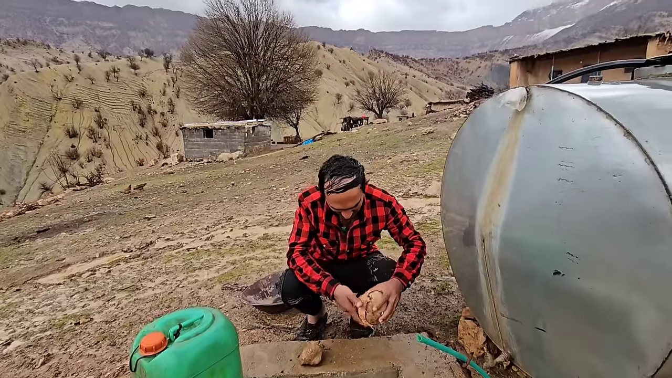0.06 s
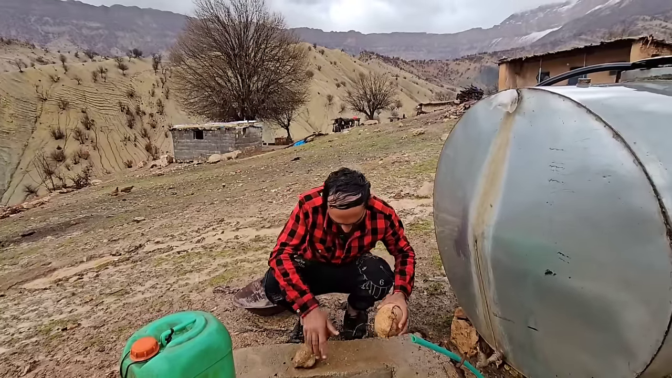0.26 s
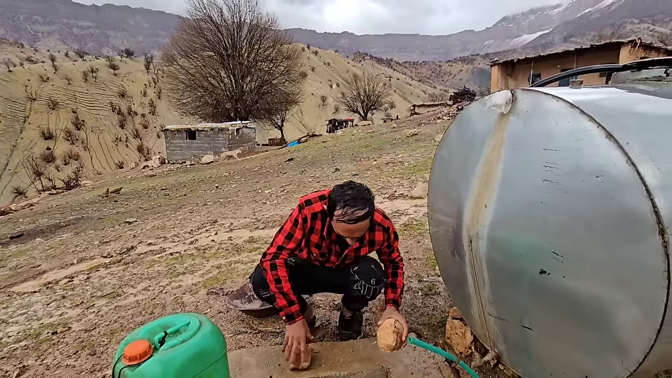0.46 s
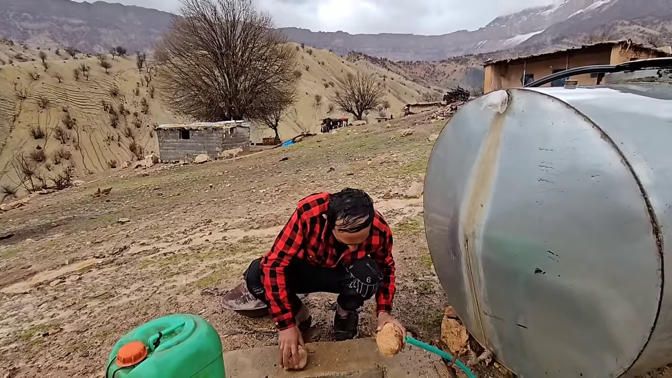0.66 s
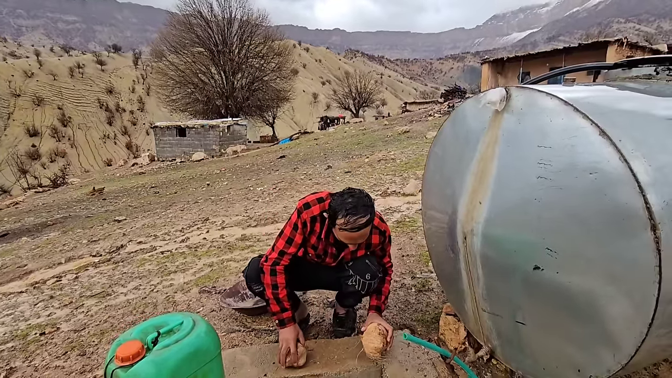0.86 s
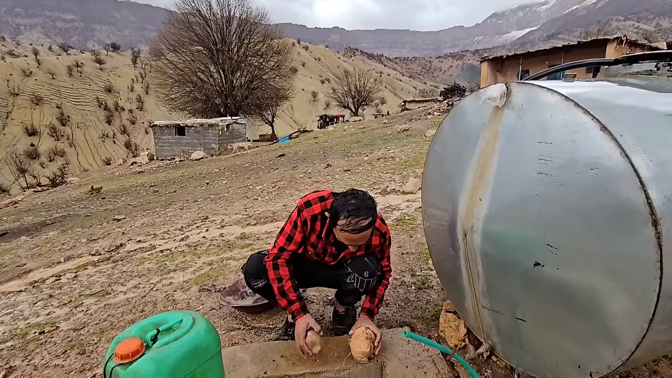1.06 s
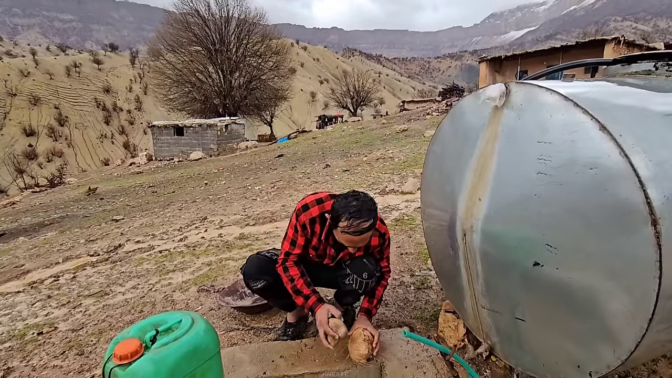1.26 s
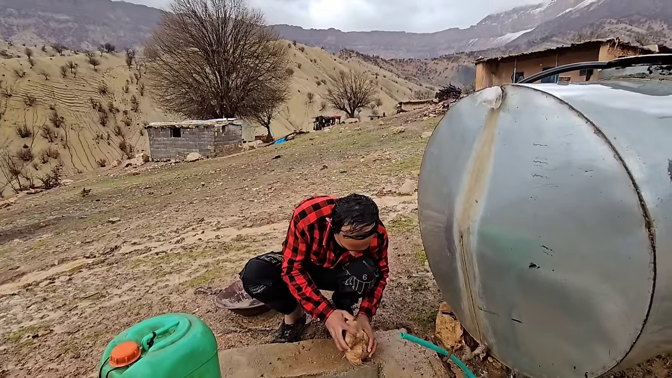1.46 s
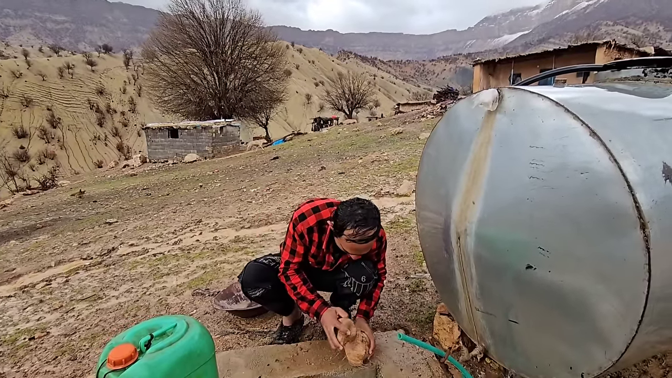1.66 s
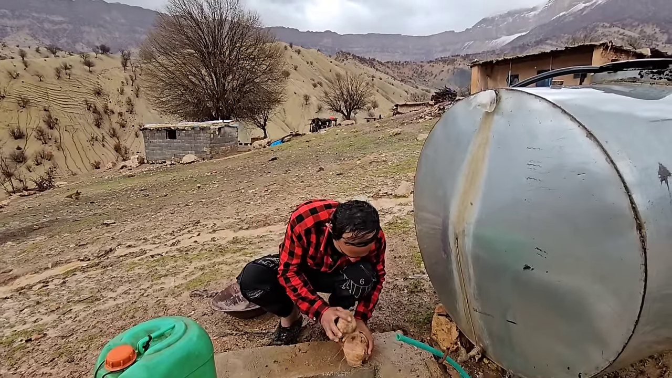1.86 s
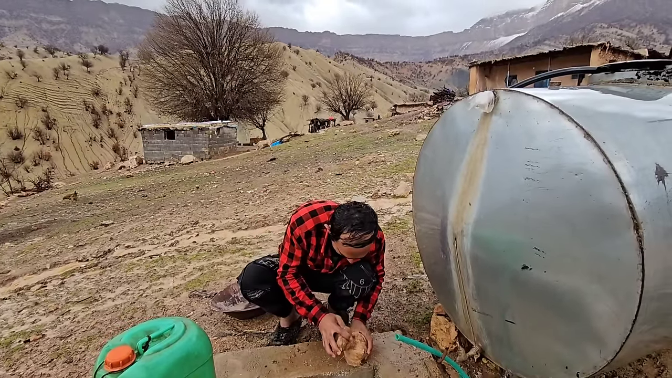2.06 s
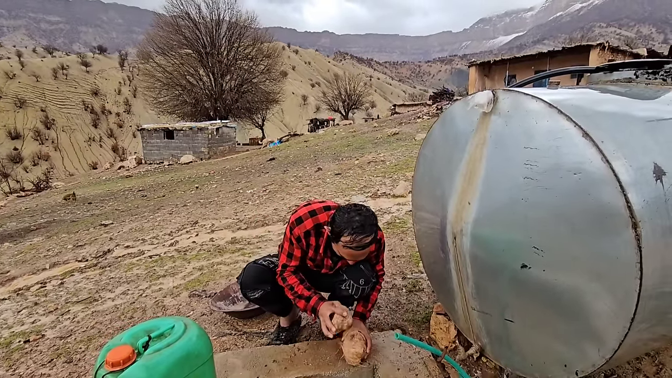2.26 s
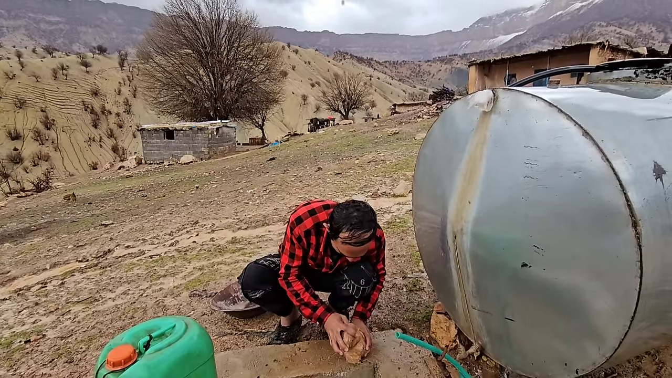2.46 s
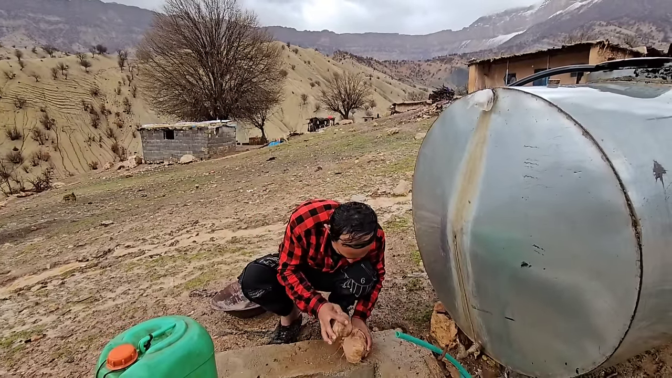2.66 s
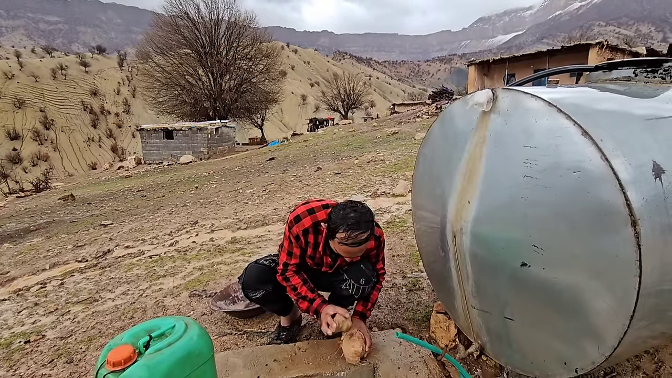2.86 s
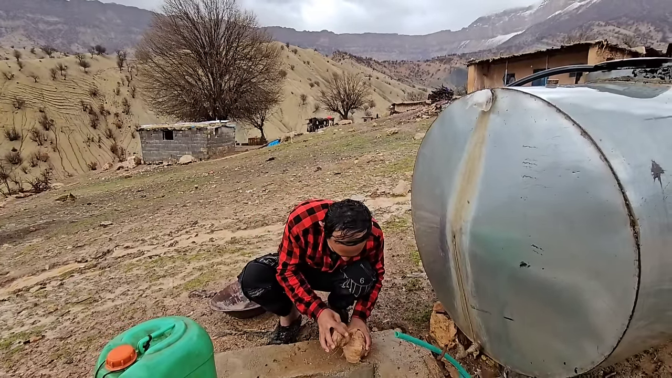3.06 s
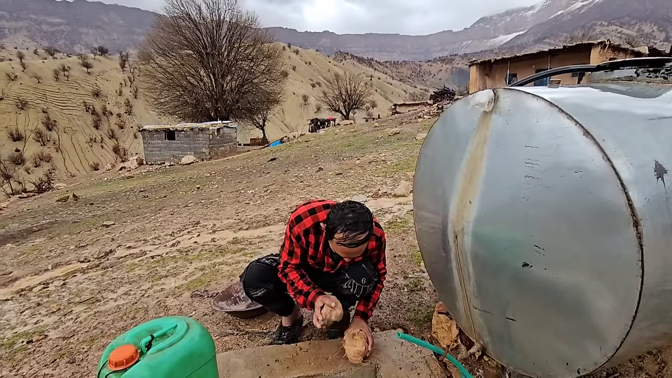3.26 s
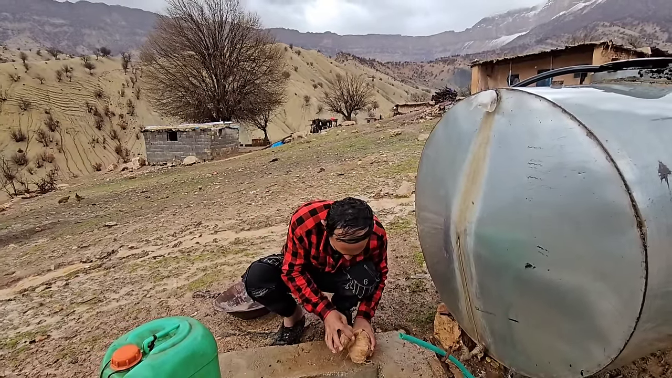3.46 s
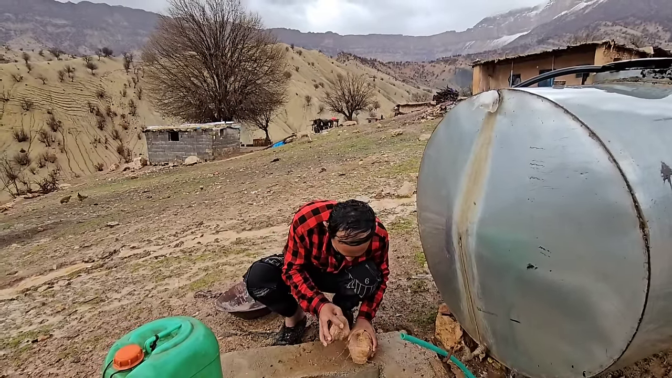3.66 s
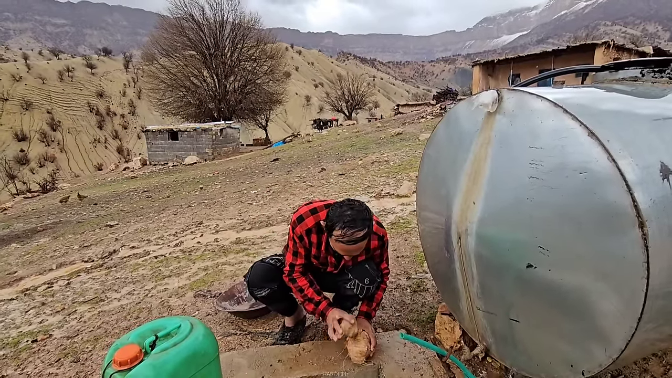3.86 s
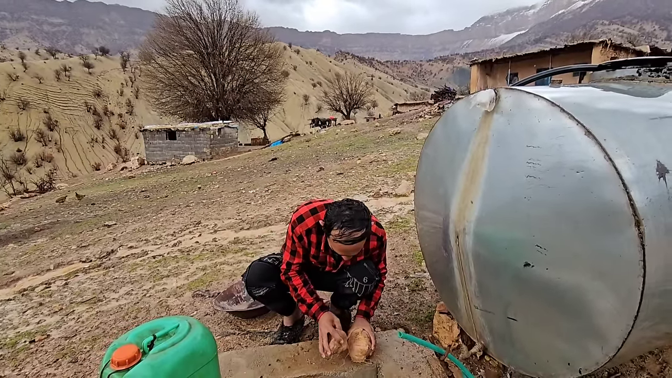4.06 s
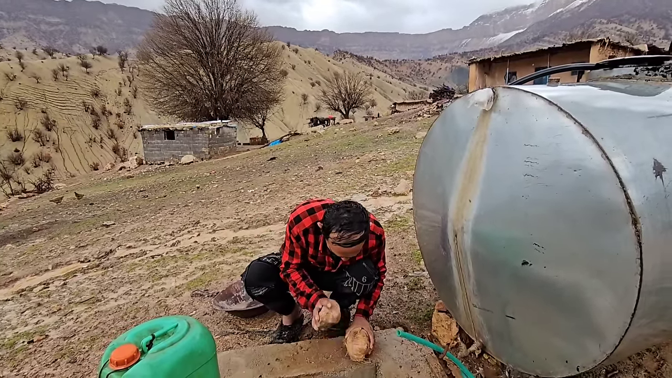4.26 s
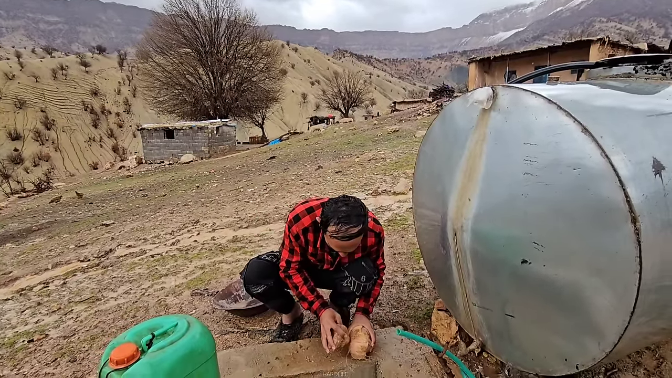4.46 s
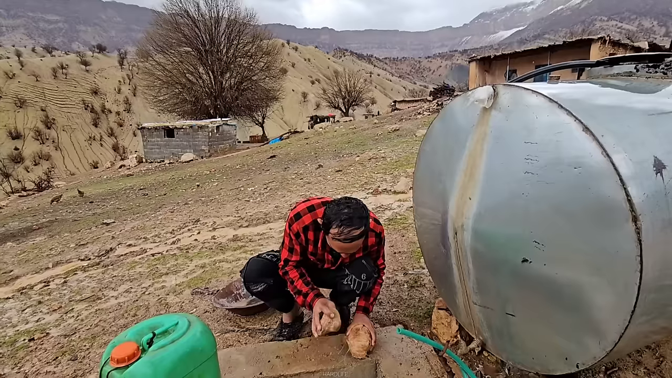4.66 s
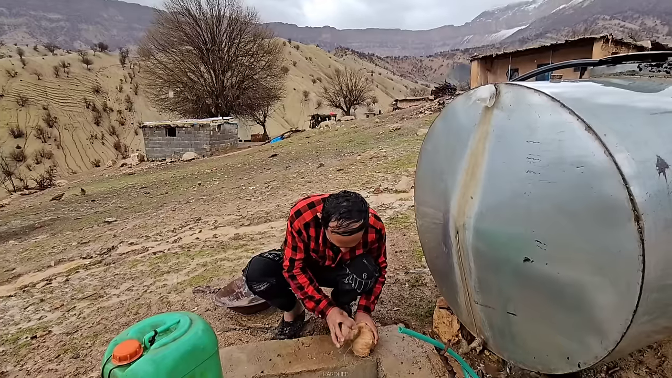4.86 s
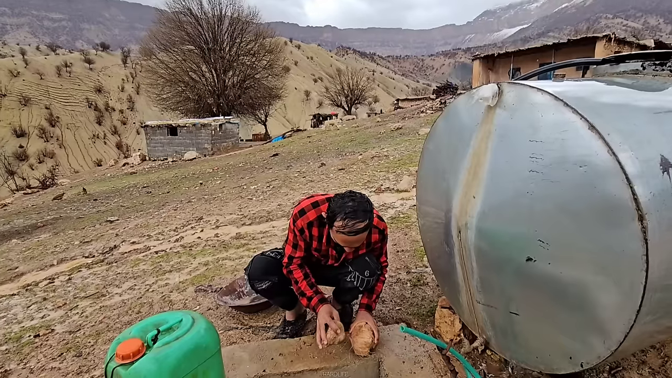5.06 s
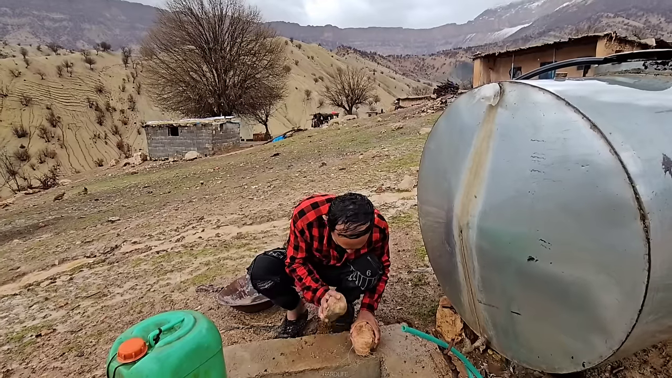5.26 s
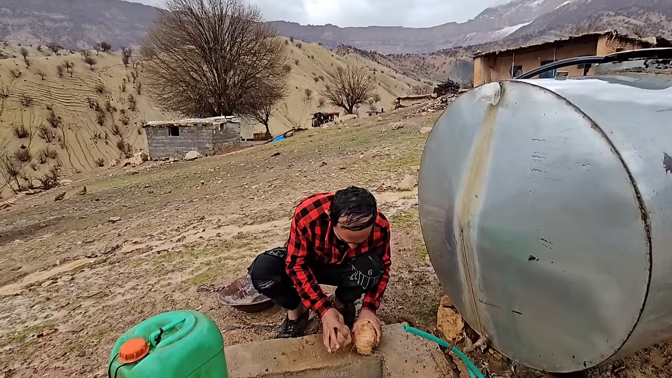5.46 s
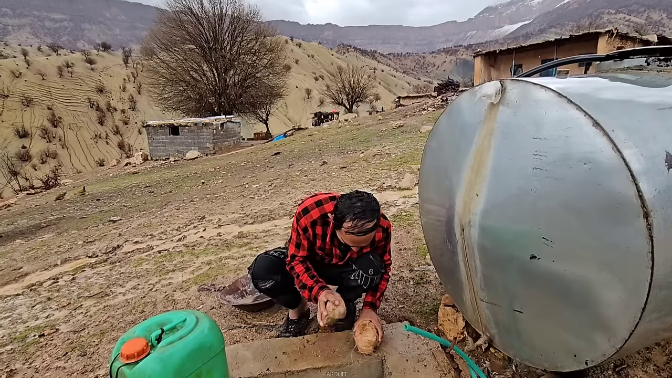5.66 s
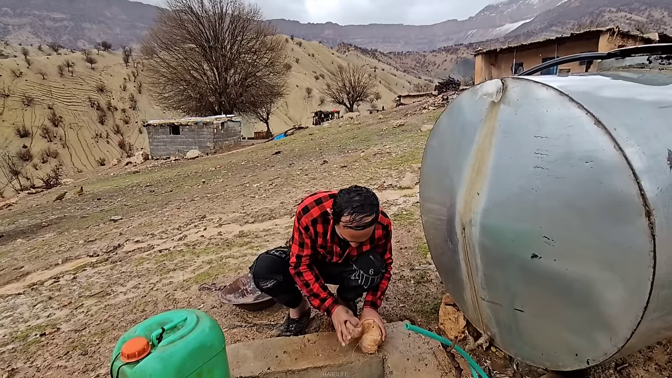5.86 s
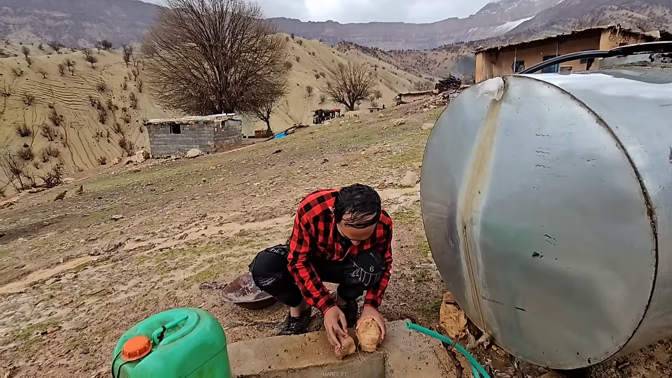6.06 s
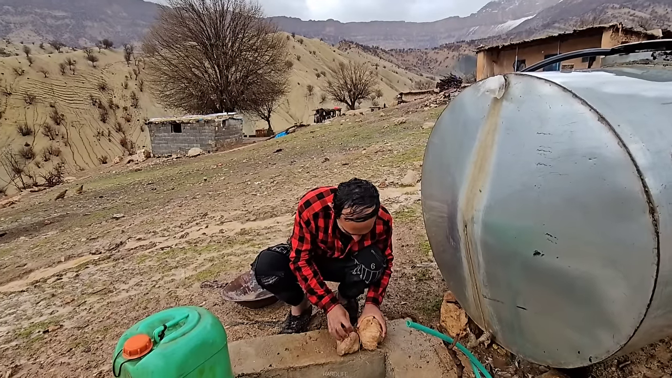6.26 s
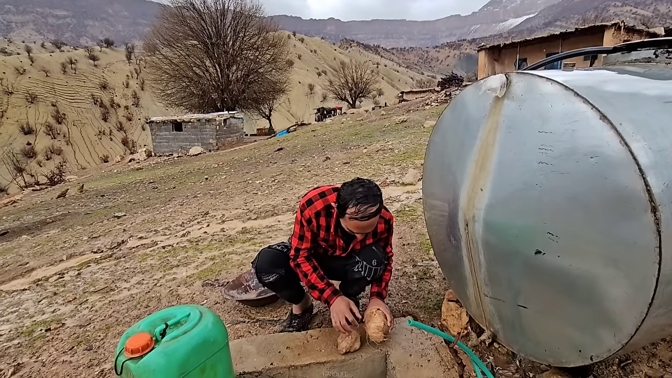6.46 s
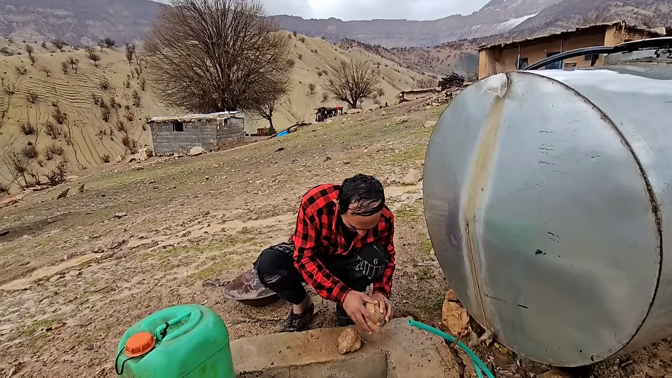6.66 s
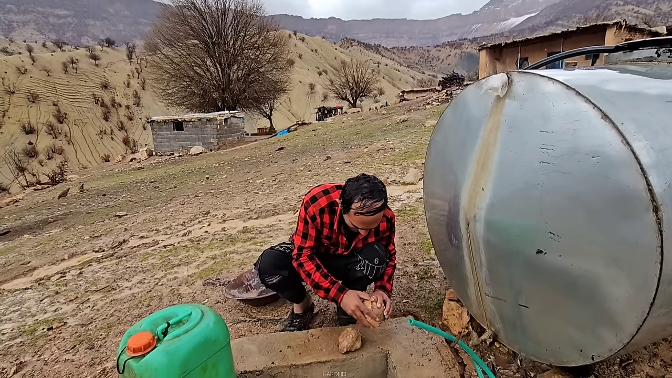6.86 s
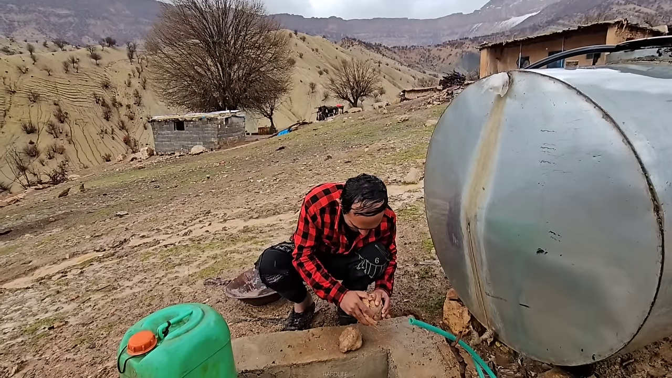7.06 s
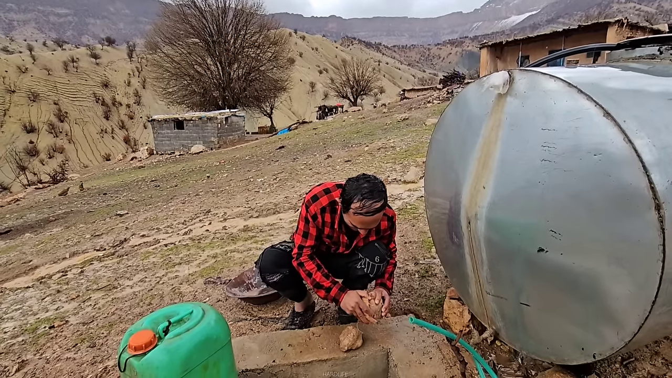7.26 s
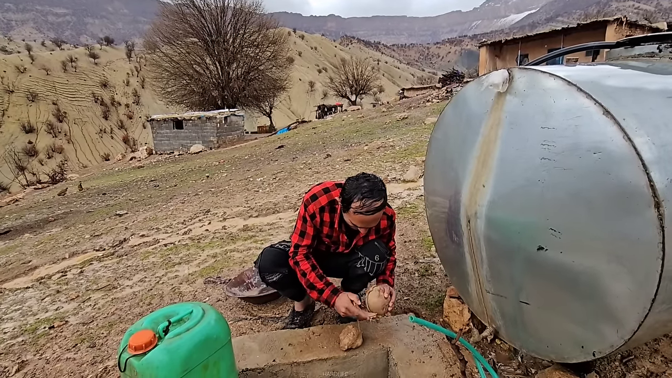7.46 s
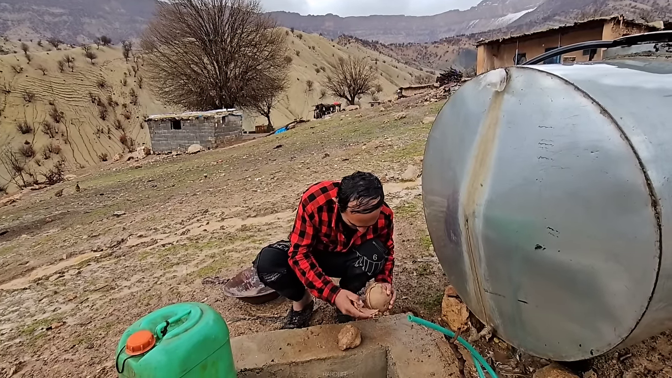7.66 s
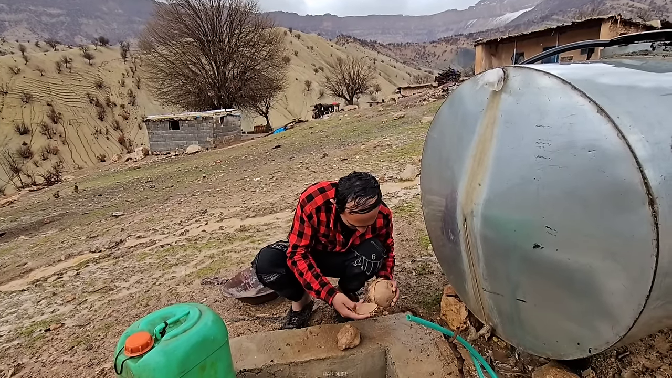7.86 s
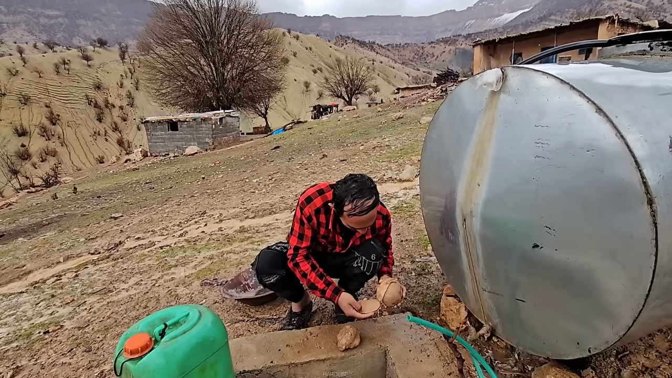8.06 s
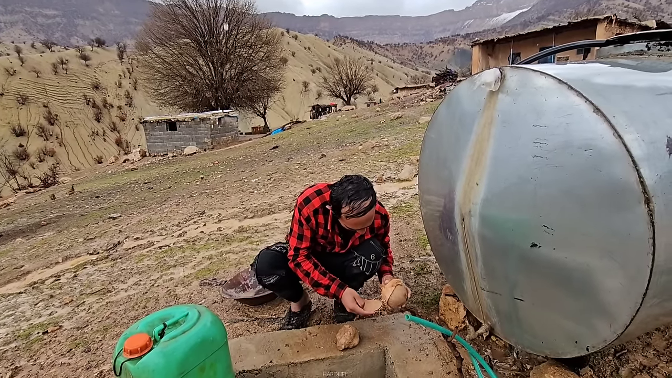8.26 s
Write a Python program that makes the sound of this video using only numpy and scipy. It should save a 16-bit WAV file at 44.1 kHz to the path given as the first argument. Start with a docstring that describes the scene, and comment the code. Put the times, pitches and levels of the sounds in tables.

```python
"""Water hisses steadily off to the left while a light wind rumbles on the microphone: both are shaped noise.
Shoes shift, a sleeve brushes and a stone scuffs; then a man on a hillside strikes stone with stone, ten times,
on a concrete slab beside a steel tank. Each blow is a noisy crack, ringing modes, a tock and a falling thump.
He drops the hammer stone, then snaps the struck one apart in his hands, in sharp bursts of crushed grain."""
import sys
import numpy as np
from scipy import signal
from scipy.fft import rfft, irfft
from scipy.io import wavfile
from scipy.ndimage import uniform_filter1d

SR = 44100
rng = np.random.default_rng(int(sys.argv[2]) if len(sys.argv) > 2 else 0)


def bounce(signal):
    """Save signal as a 16-bit WAV file at the path given by the first command-line argument."""
    frames = np.transpose(np.atleast_2d(signal))
    limited = np.clip(frames, -1, 1)
    pcm = np.round(limited * 32767).astype(np.int16)
    wavfile.write(sys.argv[1], SR, pcm)


N = 366912
T = np.arange(8192) / SR  # time axis of one short sound, s

# blows of stone on stone: (start_s, crack_db, thump_db, tock_hz, tock_db against the crack,
# upper_resonance_hz, treble_db)
BLOWS = [(1.455, -36, -34, 1270, -9, 7560, 6), (1.893, -24, -16.5, 1034, -4, 4520, -11.5),
         (2.4155, -28, -17, 1680, -5.5, 8000, -13), (2.8774, -19.5, -15, 1700, -4, 13250, -12),
         (3.3728, -17.5, -16, 1813, -2.5, 9800, 2), (3.8687, -20.5, -16, 1690, -12, 10100, -14),
         (4.3370, -15.5, -15.5, 1810, -10, 2980, -1.5), (4.8235, -15.5, -16.5, 1680, -9.5, 3520, -3.5),
         (5.3064, -15, -14, 2120, -7.5, 3900, -4), (5.8247, -13.5, -19.5, 2390, -8, 3570, -0.5)]
# colour of brittle stone and grit snapping: (pitch_hz, level_db)
SNAP_COLOUR = [(200, -6), (950, -31), (1350, -3.5), (2400, -3), (3400, -5.5), (4400, 3), (5700, -7.5),
               (6600, 1), (7900, 5.5), (9500, -0.5), (11000, -4.5), (13000, -10.5), (16000, -7.5)]

BUMP_RISE_S, BUMP_T60_S = 0.00051, 0.02


def amp(db):
    """Decibels to gain."""
    return 10 ** (np.asarray(db) / 20)


def unit(x):
    """Scales to rms 1."""
    return x / np.sqrt(np.mean(x ** 2) + 1e-20)


def burst(x):
    """Scales a short sound so that its energy equals rms 1 held for a hundredth of a second."""
    return unit(x) * np.sqrt(.01 * SR / x.shape[-1])


def read(points, hz):
    """Reads a table along a log-frequency axis."""
    f, value = np.transpose(points)
    return np.interp(np.log(hz + 1e-6), np.log(f), value)


def add(mix, s, sound):
    """Mixes a stereo sound in at time s."""
    part = mix[:, max(round(s * SR), 0):][:, :sound.shape[1]]
    part += sound[:, :part.shape[1]]


def colour(x, curve):
    """Causal, minimum-phase filter whose gain in dB is curve(Hz)."""
    size = 2 * len(T)
    log_gain = np.log(amp(curve(abs(np.fft.fftfreq(size, 1 / SR)))))
    response = np.exp(np.conj(signal.hilbert(log_gain)))
    taps = np.fft.ifft(response).real[:len(T) // 2]
    return signal.oaconvolve(x, taps[None], axes=1)[:, :x.shape[1]]


def hump(hz, centre_hz, octaves):
    """A bell of height 1 on the log-frequency axis."""
    return np.exp(-.5 * (np.log2((hz + 1) / centre_hz) / octaves) ** 2)


def lean(x, side):
    """Tips each frequency to the left or right port."""
    half_db = read(side, np.fft.rfftfreq(N, 1 / SR)) / 2
    return irfft(rfft(x) * amp([half_db, -half_db]), N)


def water(patch_db=2.0, lead_s=0.00056, level_db=-42.84):
    """Steady running water: finely mottled noise that reaches the left port first."""
    # spectrum of the water before levelling: (pitch_hz, level_db per Hz)
    water_colour = [(59, -13), (100, 1), (162, -11), (228, -4), (287, -11), (370, -13), (487, -10.5),
                    (825, -20.5), (1290, -16.5), (1920, -22), (2090, -21), (5280, -36), (8410, -40.5),
                    (10400, -43.5), (15500, -58.5)]
    # how alike the water is at the two ports: (pitch_hz, likeness 0-1)
    likeness = [(250, 0.9), (650, 0.79), (1000, 0.37), (1400, 0.15), (1800, 0.17), (3000, 0.27),
                (5000, 0.15)]
    # lean of the water: (pitch_hz, left_minus_right_db)
    water_side = [(150, 0.5), (400, 3), (800, 0.5), (1300, 3.6), (2400, 8.8), (4400, 1), (8000, 3.8),
                  (10500, 5), (14000, 32)]
    frames, hz = N // 256 + 5, np.fft.rfftfreq(1024, 1 / SR)
    a, b, c, d, patches = rng.standard_normal((5, frames, len(hz)))
    patches = uniform_filter1d(patches, size=7, axis=0)
    patches = unit(uniform_filter1d(patches, size=12, axis=1))
    same = np.clip(read(likeness, hz), 0, 1)
    left = a + 1j * b
    # the lead shrinks towards the bass
    delay = np.exp(-2j * np.pi * hz * lead_s * hz / (hz + 250))
    right = same * left * delay + np.sqrt(1 - same ** 2) * (c + 1j * d)
    z = np.array([left, right]) * amp(read(water_colour, hz) + patch_db * patches)
    hiss = signal.istft(z.swapaxes(1, 2), nperseg=1024, noverlap=768)[1][:, :N]
    return amp(level_db) * unit(lean(hiss, water_side))


def wind(apart=0.35, buffet_db=4.0, lift_db=2.66):
    """Low lumpy gusts of filtered noise, a little different at each port."""
    # strength of the wind before the lift and the buffets: (time_s, level_db)
    gusts = [(0.0, -43), (0.16, -52.5), (1.04, -51), (1.48, -45.5), (1.85, -42.5), (2.17, -49.5),
             (2.8, -45.5), (3.12, -53), (4.32, -52.5), (4.51, -51), (5.15, -47), (5.57, -41), (5.8, -38),
             (6.26, -46), (6.7, -42), (6.94, -50.5), (7.7, -55), (8.3, -47.5)]
    # colour of the rumble: (pitch_hz, level_db)
    rumble_colour = [(15, -31), (35, -2), (60, -0.5), (90, -5.5), (140, -13), (300, -26.5), (1000, -64.5)]
    noise = rng.standard_normal((4, N))
    rumble = unit(colour(noise[0] + apart * noise[1:3], lambda f: read(rumble_colour, f)))
    buffets = unit(uniform_filter1d(uniform_filter1d(noise[3], size=3000), size=2000))
    strength_db = np.interp(np.arange(N) / SR, *np.transpose(gusts)) + buffet_db * buffets
    return rumble * amp(lift_db + strength_db) * amp([[-1.8], [.3]])  # port trims, dB


def contact(rise, t60, shared, size=70):
    """Grains crush where stones meet: a spray of force, even in spectrum, partly alike at both ports."""
    shared = np.clip(shared, 0, 1)
    noise = rng.standard_normal((3, len(T)))
    mixed = np.sqrt(shared) * noise[0] + np.sqrt(1 - shared) * noise[1:]
    spray = mixed * (1 - np.exp(-T / rise)) * 1e-3 ** (T / t60)
    z = rfft(spray)
    # divide by the spectrum smoothed over size bins
    even = irfft(z / np.sqrt(uniform_filter1d(abs(z) ** 2, size, axis=1)))
    return even * (T < T[-1] / 2)


def grit(per_s=22, level_db=-71, spread_db=4.5):
    """Stray tiny ticks of sand under hands and feet: contacts at random moments."""
    strengths = amp(spread_db * np.minimum(rng.exponential(1, N), 3))
    clicks = (rng.random(N) < per_s / SR) * strengths
    tick = contact(rise=0.00013, t60=.015, shared=0.52)
    ticks = signal.oaconvolve(clicks[None], tick, axes=1)[:, :N]
    return amp(level_db) * unit(colour(ticks, lambda f: read(SNAP_COLOUR, f)))


def shuffle(start_s=.3, length_s=1.18, level_db=-53, fade=0.47):
    """Shoes grind quietly on damp soil while he settles: one slow swell of noise."""
    out, size = np.zeros((2, N)), int(length_s * SR)
    soil = colour(rng.standard_normal((2, N)), lambda f: 35 * hump(f, 1350, octaves=1.7))[:, :size]
    add(out, start_s, amp(level_db) * unit(soil) * signal.windows.tukey(size, fade))
    return out


def knock(hz, rise, t60, lift_db):
    """A stone meets the slab: a dull knock of crushed grain centred on hz."""
    # colour of the knock: (multiple of the centre pitch, level_db)
    knock_colour = [(.1, 2.5), (.35, 7.5), (.7, 0.5), (1, 5), (1.35, 2.5), (1.9, -12.5), (4, -33),
                    (12, -48)]
    force = contact(rise, t60, shared=0.72)
    return burst(colour(force, lambda f: read(knock_colour, f / hz) + lift_db * hump(f, hz, octaves=0.3)))


def heave(hz=70, decay=0.015, rise=0.011):
    """The soil under the slab gives way and springs back: a low damped sine of varying pitch."""
    wave = np.sin(2 * np.pi * hz * rng.uniform(0.84, 1.34) * T)
    return burst(wave * (1 - np.exp(-T / rise)) * np.exp(-T / decay))


def bumps(heave_db=-5):
    """A stone is nudged, set down or let fall on the slab, which heaves a little under it."""
    # dull bumps: (start_s, level_db, centre_hz)
    landings = [(0.3366, -44, 1400), (2.497, -32, 161), (5.6352, -44, 680), (5.9041, -23.5, 1130),
                (5.984, -41, 820), (6.159, -31.5, 1030), (7.5356, -46, 1820)]
    out = np.zeros((2, N))
    for s, db, hz in landings:
        dull = knock(hz, BUMP_RISE_S, BUMP_T60_S, lift_db=-1)
        add(out, s, amp(db) * (dull + amp(heave_db) * heave()))
    return out


def resonate(x, hz, width):
    """A resonance that follows the curve hz, with its bandwidth in Hz."""
    turn, r = np.exp(2j * np.pi * np.cumsum(hz) / SR), np.exp(-np.pi * width / SR)
    return 2 * (turn * signal.lfilter([1 - r], [1, -r], x / turn)).real


def stroke(length, hz, sink, swish_db, grain_db=4, hiss_width_hz=6000, width_hz=450,
           overtone=1.58, overtone_db=-5, clump_db=1.5):
    """A soft rub in clumps of grains: broad hiss and a two-banded swish, sinking in pitch as it slows."""
    shape = (2, int(length * SR))
    clumps = unit(uniform_filter1d(rng.standard_normal(shape[1]), size=500))
    grain_levels = grain_db * np.minimum(rng.exponential(1, shape), 2) + clump_db * clumps
    grains = rng.standard_normal(shape) * amp(grain_levels)
    track = hz * np.linspace(1 + sink, 1 - sink, shape[1])
    hiss = resonate(resonate(grains, track, hiss_width_hz), track, hiss_width_hz)
    upper_band = amp(overtone_db) * resonate(grains, overtone * track, width_hz)
    swish = resonate(grains, track, width_hz) + upper_band
    rub = unit(hiss) + amp(swish_db) * unit(swish)
    return unit(rub * signal.windows.tukey(shape[1], .7))


def brushes():
    """Sleeves brush against the knees as he reaches out: sinking strokes of grainy noise."""
    # sleeve strokes: (start_s, length_s, level_db, centre_hz, sink either side as a share of the centre)
    sleeve_strokes = [(0.588, .275, -49, 6030, 0.46), (8.208, 0.11, -53.5, 9700, .05)]
    out = np.zeros((2, N))
    for s, length, db, hz, sink in sleeve_strokes:
        add(out, s, amp(db) * stroke(length, hz, sink, swish_db=-8))
    return out


def scuffs(sand_db=-19.5, sand_hz=7940, sand_s=0.079):
    """The hammer stone drags on concrete as it is picked up: a hollow rub amid a sandy hiss."""
    # scuffs: (start_s of the rub, level_db)
    drags = [(.96, -38), (1.072, -36)]
    out = np.zeros((2, N))
    for s, db in drags:
        add(out, s, amp(db) * knock(1350, rise=0.0017, t60=0.11, lift_db=11))
        sand = stroke(sand_s, sand_hz, sink=.05, swish_db=-20)
        add(out, s - sand_s / 2, amp(db + sand_db) * sand)
    return out


def ring(detune=0.013, port_radians=2.0):
    """The stones' modes: decaying sines, detuned and phased afresh each time they are set off."""
    # modes of the stones: (pitch_hz, level_db, t60_s)
    modes = [(999, 13, 0.034), (1283, -7.5, 0.13), (1800, -10, 0.028), (2150, -18.5, 0.018),
             (2730, -36, .04), (3320, 14, 0.021), (4510, 4, 0.034), (4730, -20, 0.066), (5630, -9, 0.047),
             (6680, 5, 0.026), (7300, 0, 0.053), (8200, -17, 0.14), (9300, -13, 0.052)]
    hz, db, t60 = np.transpose(modes)[:, :, None]
    shift, start, *ports = rng.uniform(-1, 1, (4, len(modes), 1))
    phase = np.pi * start + port_radians * np.array(ports)
    waves = np.sin(2 * np.pi * hz * (1 + detune * shift) * T + phase)
    return burst((amp(db) * 1e-3 ** (T / t60) * waves).sum(1))


def snaps(ring_db=-11, side_db=-2):
    """Grit breaks and the cracked stone gives way, in sudden snaps and slower scrapes that set it ringing."""
    # snaps of grit and of the splitting stone: (start_s, level_db)
    breaks = [(1.3953, -55), (2.116, -53.5), (3.1111, -47), (3.6043, -59), (5.7479, -54.5), (6.1663, -55),
              (7.028, -55), (7.3144, -29), (7.322, -34), (7.3271, -28.5), (7.3352, -24.5), (7.349, -12.5),
              (7.467, -53.5), (7.536, -55.5)]
    # rough stone faces grating past each other: (start_s, level_db)
    scrapes = [(1.452, -34.5), (7.0545, -36.5), (7.339, -22.5)]
    out = np.zeros((2, N))
    # rise and t60 in s
    for events, rise, t60 in (breaks, 0.00036, 0.019), (scrapes, .008, 0.029):
        for s, db in events:
            force = burst(contact(rise, t60, shared=0.12, size=200)) + amp(ring_db) * ring()
            snap = colour(force, lambda f: read(SNAP_COLOUR, f))
            add(out, s, amp(db) * burst(snap) * amp([[side_db], [-side_db]]))
    return out


def tock(hz, swell=0.00076):
    """The air in the gap between the stones rings for a few cycles: a hollow, pitched knock."""
    return burst(-np.sin(2 * np.pi * hz * T) * T * np.exp(-T / swell))


def thump(hz, lead_hz=330, glide=0.003, rise=0.0028, decay=0.008):
    """The slab is pushed down; its short bending waves arrive first, so the pitch falls."""
    turns = np.cumsum(hz + lead_hz * np.exp(-T / glide)) / SR
    return burst(-np.sin(2 * np.pi * turns) * (1 - np.exp(-T / rise)) * np.exp(-T / decay))


def blows(ring_db=-8, heave_db=-12, upper_octaves=0.42):
    """Each blow: a crack, a short ring of the stones, a hollow tock and a thump of the slab."""
    # colour of stone on stone: (pitch_hz, level_db)
    crack_colour = [(100, 0.5), (330, -3), (440, 5.5), (560, -0.5), (840, -10.5), (1050, 4.5), (1420, -2),
                    (2000, 2.5), (3300, -5.5), (5700, -5.5), (8000, -3), (10000, -5), (13000, -10),
                    (16000, -11)]
    usual_db, rise_s, rise_halves_db = -18, 0.00067, 0.5
    upper_lift_db, upper_db_per_db = 3.5, 1.28
    thump_hz, loose_hz, bedding_blows = 119.5, 91, 1.3
    out = np.zeros((2, N))
    for k, (s, db, thump_db, tock_hz, tock_db, upper_hz, treble_db) in enumerate(BLOWS):
        # a harder blow makes a shorter contact: its force rises faster
        harder_db = db - usual_db
        rise = rise_s * 2 ** (-harder_db / rise_halves_db)
        force = contact(rise, t60=0.025, shared=0.54)
        crack = burst(colour(force, lambda f: read(crack_colour, f))) + amp(ring_db) * ring()
        # harder blows excite the upper resonance more; its pitch and the treble vary by blow
        lift_db = upper_lift_db + upper_db_per_db * max(harder_db, 0)
        crack = colour(crack, lambda f: lift_db * hump(f, upper_hz, upper_octaves)
                       + treble_db * f ** 2 / (f ** 2 + 3500 ** 2))
        clack = burst(crack) + amp(tock_db) * tock(tock_hz)
        # the stone beds in on the slab over the first blows, so the thump deepens
        slab_hz = thump_hz + loose_hz * np.exp(-k / bedding_blows)
        thud = thump(slab_hz) + amp(heave_db) * heave()
        add(out, s, amp(db) * clack + amp(thump_db) * thud)
    return out


def settling(uneven_db=3, uneven_s=0.0036):
    """After each blow the struck stone hops and lands again, then rocks once with a soft low thud."""
    # levels are against the thump of the blow
    hop_s, hop_knock_db, hop_thud_db = .0135, -15, -20.5
    rock_s, rock_db = .044, -18
    out = np.zeros((2, N))
    chances = rng.uniform(-0.95, 1, (len(BLOWS), 2))
    for (s, _, thump_db, *_), (size, late) in zip(BLOWS, chances):
        landing = amp(hop_knock_db) * knock(1150, BUMP_RISE_S, t60=0.024, lift_db=-0.5)
        thud = amp(hop_thud_db) * thump(171, lead_hz=123)
        add(out, s + hop_s, amp(thump_db) * (landing + thud))
        rock = amp(thump_db + rock_db + uneven_db * size) * thump(125, lead_hz=119)
        add(out, s + rock_s + uneven_s * late, rock[None])
    return out


def hillside(x, tail_db=-16, echo_db=-1, onset=0.0029, skew=.0003):
    """A few early echoes and a short scatter of decaying noise from the rough ground."""
    # echoes of tank, ground and wall: (delay_s, level_db before echo_db)
    echoes = [(.0056, -17.5), (.0095, -19.5), (0.0151, -18), (0.0312, -28), (.0445, -34)]
    # fading of the scatter: (pitch_hz, t60_s)
    tail_fade = [(120, 0.2), (500, 0.19), (1500, 0.11), (5000, 0.17), (15000, 0.092)]
    hz, t, z = signal.stft(rng.standard_normal((2, SR // 2)), SR, nperseg=256)
    tail = signal.istft(z * 1e-3 ** (t / read(tail_fade, hz)[:, None]), SR, nperseg=256)[1]
    tail *= 1 - np.exp(-(np.arange(tail.shape[1]) / SR / onset) ** 2)
    # long waves reach both ports alike
    low_pass = signal.butter(2, 600, fs=SR, output="sos")
    tail[1] += signal.sosfiltfilt(low_pass, tail[0] - tail[1])
    response = amp(tail_db) * tail / np.linalg.norm(tail[0])
    for s, db in echoes:
        arrival = ((s + skew * rng.uniform(-1, 1, 2)) * SR).astype(int)
        response[[0, 1], arrival] += amp(db + echo_db)
    return x + signal.fftconvolve(x, response, axes=1)[:, :N]


def scene():
    """The stone work in its surroundings, over water and wind."""
    # lean of the near sounds and their echoes: (pitch_hz, left_minus_right_db)
    stone_side = [(500, 0), (1100, 3.5), (2100, 10.5), (3600, -3), (5500, -2), (8200, 7.5), (11000, -1.5),
                  (15000, 2)]
    near = grit() + shuffle() + bumps() + brushes() + scuffs() + snaps() + blows() + settling()
    return water() + wind() + lean(hillside(near), stone_side)


def record(dry, edge_hz=15850):
    """The loudest peaks clip near full scale; then a steep low-pass sets the band limit."""
    low_pass = signal.firwin(511, edge_hz, window=("kaiser", 9), fs=SR)
    return signal.oaconvolve(np.clip(dry, -.93, .93), low_pass[None], "same")


dry = scene()
out = record(dry)
bounce(out)
```